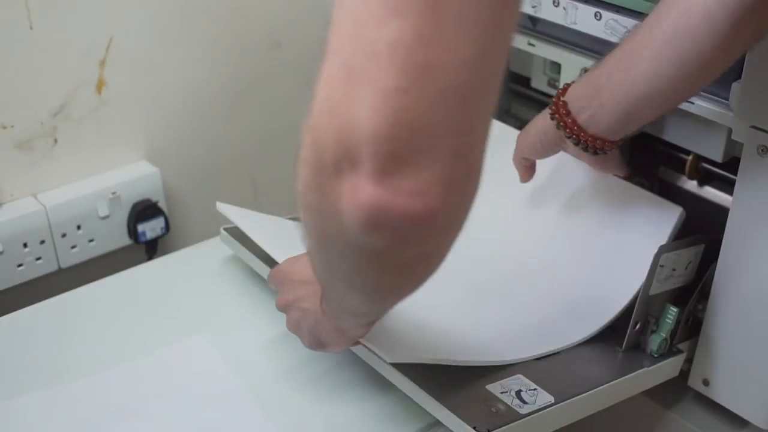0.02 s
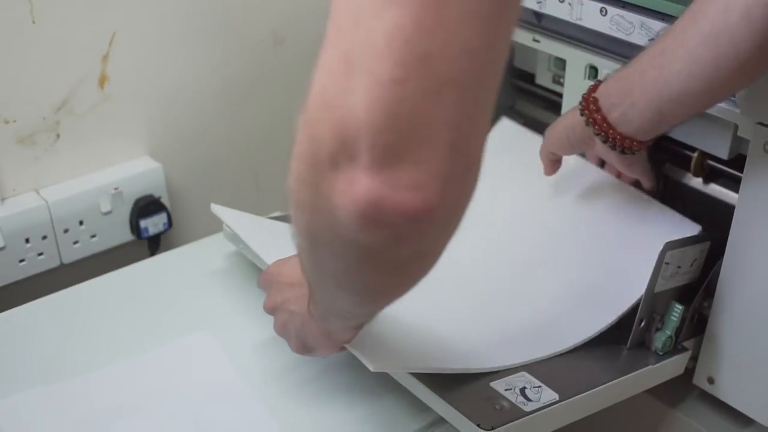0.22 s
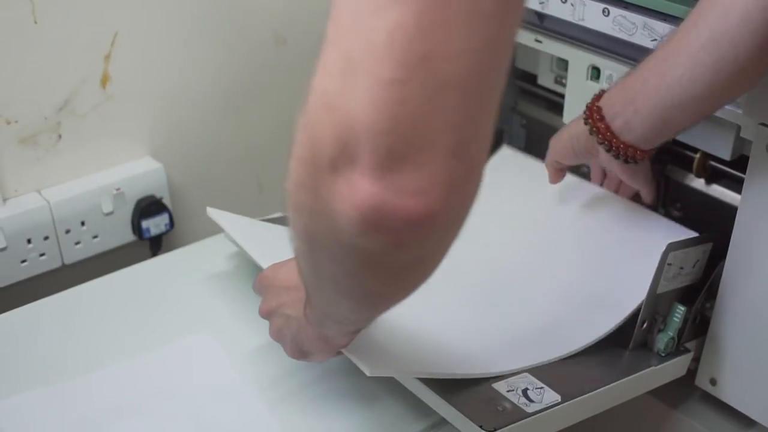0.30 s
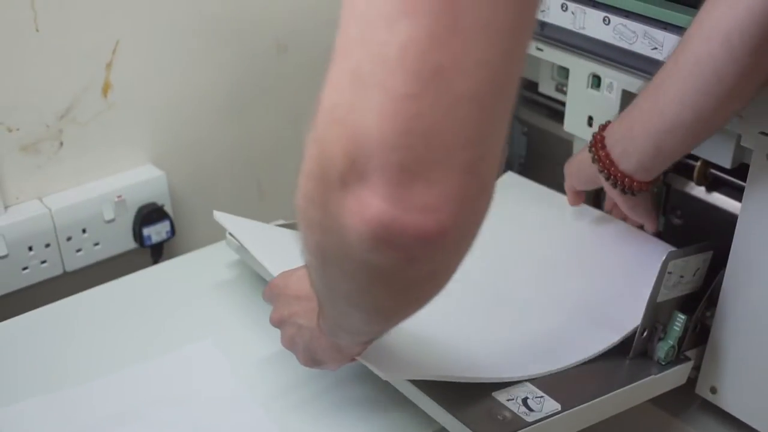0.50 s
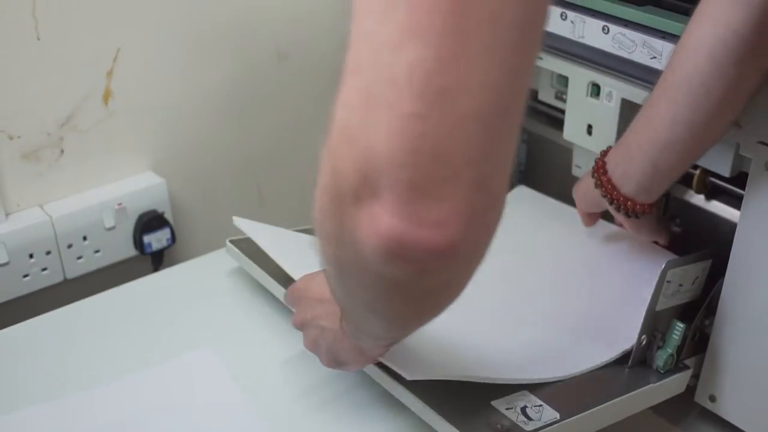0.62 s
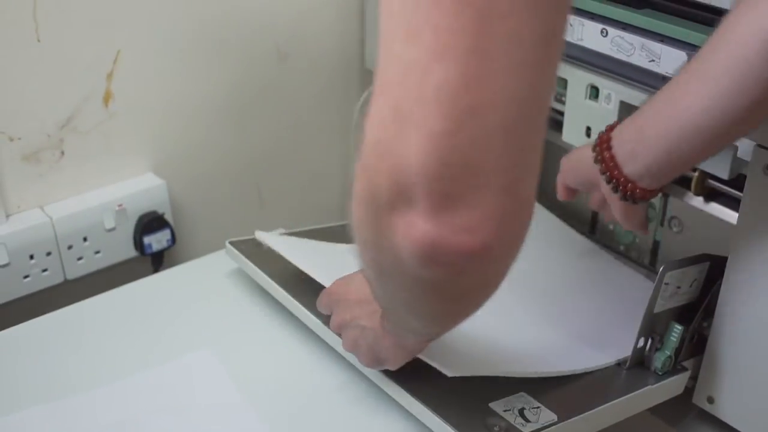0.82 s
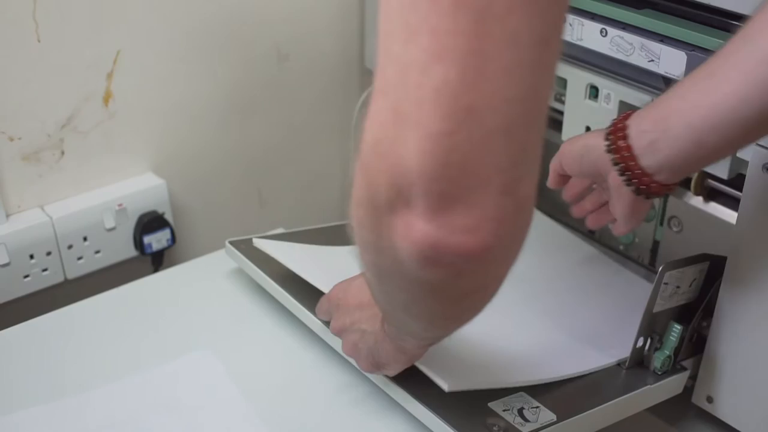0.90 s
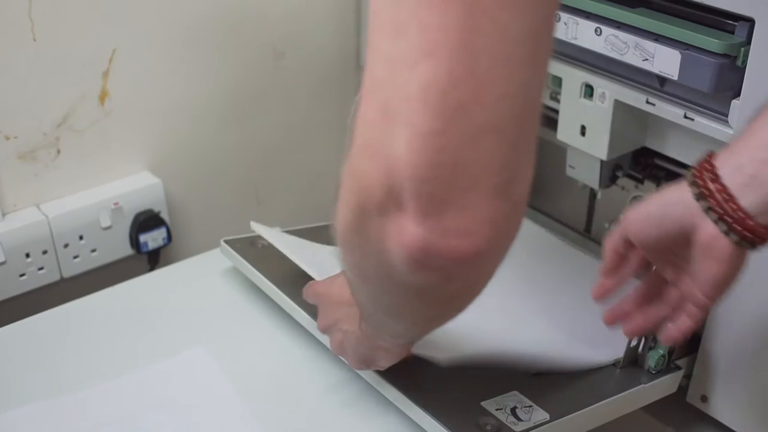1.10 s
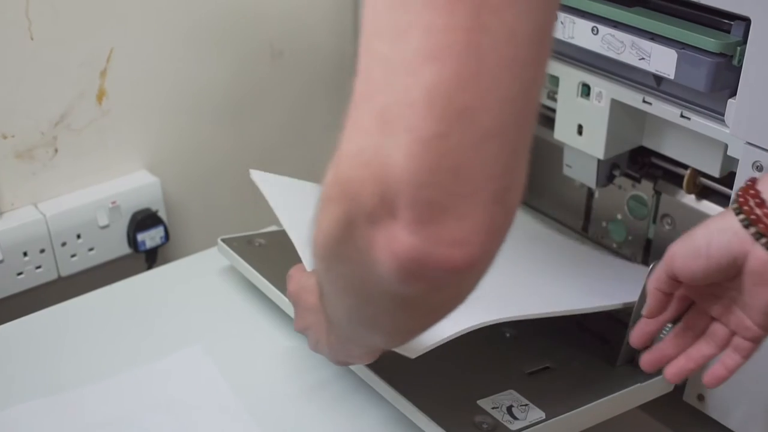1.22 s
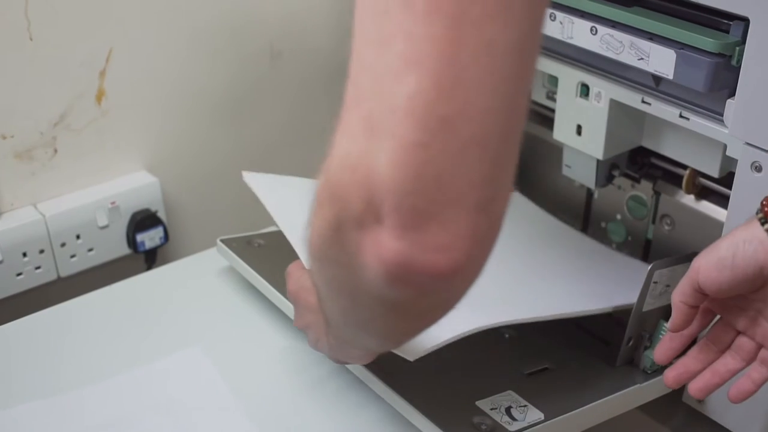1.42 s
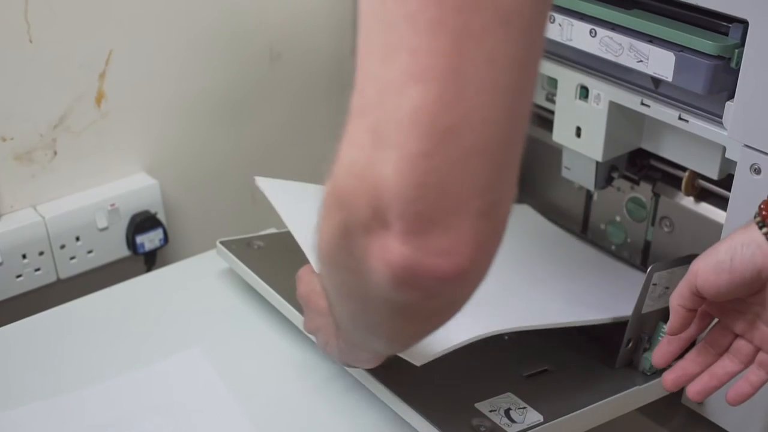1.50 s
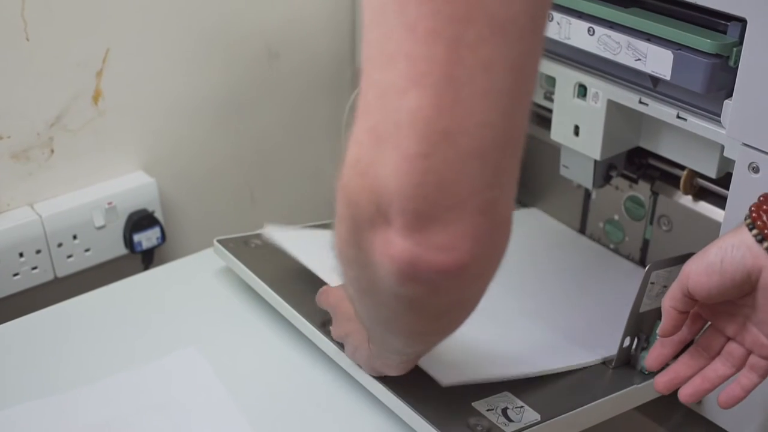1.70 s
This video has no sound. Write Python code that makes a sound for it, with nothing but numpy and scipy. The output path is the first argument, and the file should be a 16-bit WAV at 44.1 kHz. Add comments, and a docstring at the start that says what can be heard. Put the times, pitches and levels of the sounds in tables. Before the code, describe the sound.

In a small room with a faint fan hum, a paper stack flaps softly and knocks down on a metal tray, which rings briefly. Light fingertip brushing follows, then sliding paper and a few more soft flaps.

```python
"""In a small print room, a fan hums faintly over a low rumble. A thick stack of paper drops against
a printer's metal feed tray: a quick clatter of knocks sets the tray ringing. Fingers brush the top
sheet, and the stack hisses and rasps as it is dragged back and lifted. At the start and near the end
it buckles with soft flaps. The room adds a short echo to the knocks and flaps."""
import sys
import numpy as np
from scipy import signal
from scipy.io import wavfile

SR = 44100
rng = np.random.default_rng(int(sys.argv[2]) if len(sys.argv) > 2 else 0)


def transcribe(signal):
    """Save signal, clipped to [-1, 1], as a 16-bit WAV file at the path in sys.argv[1]."""
    frames = np.atleast_2d(signal).T
    limited = np.clip(frames, -1, 1)
    pcm = np.round(limited * 32767).astype(np.int16)
    wavfile.write(sys.argv[1], SR, pcm)


N = 74970
T = np.arange(N) / SR
BAND_EDGES_HZ = 28 * 2 ** (np.arange(29) / 3)  # three bands to an octave

# how long the room echoes: (frequency [Hz], time to fade by 60 dB [s])
ROOM_ECHO = [(60, 0.27), (160, 0.45), (300, 0.53), (700, .38), (2500, 0.5), (5000, 0.42), (9000, 0.33),
             (15000, 0.37)]
# how alike the two ears' noise is: (frequency [Hz], likeness [0 to 1])
EAR_LIKENESS = [(60, 0.99), (300, 0.91), (1000, 0.54), (2000, 0.4), (4000, 0.37), (8000, 0.25),
                (14000, 0.11)]
# where the sounds sit between the ears: (frequency [Hz], left minus right [dB])
PAPER_PAN = [(250, 0.0026), (4000, .3), (13000, 0.61)]
BRUSH_PAN = [(3000, 1), (13000, 6.1)]
KNOCK_PAN = [(250, -1), (1000, 0.5), (4000, 1.5), (8000, 0.9), (13000, 3.5)]

# each noise's mix of low and high sound: (frequency [Hz], relative level [dB])
FAN_COLOUR = [(30, -7.5), (90, 3), (200, -6), (520, -4.5), (800, -9.5), (1600, -14.5), (3200, -21.5),
              (7000, -30), (15000, -24.5)]
BRUSH_COLOUR = [(800, -30.5), (2800, -16), (5500, -24), (7000, -11.5), (10000, -8.5), (13500, -1),
                (16000, -5)]
SLIDE_COLOUR = [(900, -24.5), (2200, -7.5), (3200, -3), (4700, 1.5), (7000, -1), (13000, -.5),
                (16000, -0.5)]
SCUFF_COLOUR = [(200, -28), (450, 1), (700, -1.5), (1300, 3), (1800, -4.5), (2300, -5.5), (3000, 2.5),
                (4500, -20.5), (9000, -27.5)]
FLAP_COLOUR = [(40, -24.5), (110, -15), (240, -3), (350, -4.5), (600, -3.5), (860, -4), (1100, -11.5),
               (2100, -23.5), (3200, -18), (5000, -41), (15000, -40.5)]
CRACK_COLOUR = [(200, -18.5), (700, -10.5), (1550, -3), (2600, -5), (4000, -9), (6500, -21.5), (9000, -31),
                (15000, -42.5)]
KNOCK_COLOUR = [(35, -41), (70, -18), (120, -9.5), (170, -7), (250, -1), (470, -1), (900, -9.5),
                (1600, -12), (2700, -16), (4500, -27), (8000, -32.5), (15000, -33.5)]

# how the longer sounds grow and fade: (time [s], level [dB])
RUMBLE_LEVELS = [(0, -40.5), (.18, -57.5), (.3, -50.5), (.54, -55.5), (.6, -48.5), (.74, -52.5), (.86, -56),
                 (.97, -70), (1.14, -62), (1.23, -49.5), (1.4, -51.5), (1.7, -71)]
BRUSH_LEVELS = [(.6, -100), (.635, -66), (.7, -62.5), (.712, -51), (.745, -46.5), (.772, -59),
                (.812, -56.5), (.85, -71), (.97, -77.5), (1.025, -60.5), (1.08, -59), (1.2, -57.5),
                (1.3, -87.5)]  # fingertips on the top sheet
SLIDE_LEVELS = [(0, -49.5), (.04, -50.5), (.072, -47.5), (.1, -59), (.15, -70), (.6, -88), (.95, -98),
                (1.0, -70), (1.06, -53), (1.11, -53), (1.155, -48), (1.24, -53.5), (1.283, -46.5),
                (1.312, -57), (1.355, -50), (1.4, -55), (1.45, -62), (1.55, -69), (1.7, -107)]  # sheet on sheet
SCUFF_LEVELS = [(0, -47.5), (.08, -60), (.14, -71), (.5, -90), (1.05, -77), (1.11, -76), (1.155, -65.5),
                (1.21, -64.5), (1.26, -56), (1.28, -45.5), (1.305, -59), (1.335, -49.5), (1.45, -61),
                (1.52, -61), (1.56, -65), (1.6, -83.5), (1.7, -93)]  # the stack's underside on the tray

# the paper's edge rasps on the tray: (start [s], length [s], pitch [Hz], rough width [Hz], level [dB])
RASPS = [(0, 0.11, 2360, 500, -57.5), (0.988, 0.44, 3260, 300, -61), (1.049, 0.083, 3320, 220, -57.5),
         (1.065, 0.17, 1690, 258, -63), (1.12, 0.13, 1200, 600, -62.5), (1.312, 0.24, 2930, 1170, -61),
         (1.472, 0.15, 8700, 885, -70)]
# the bent stack drums: (start [s], length [s], pitch [Hz], relative level [dB], waver [share of pitch])
BENDS = [(0, .055, 440, -39, .15), (0, .055, 365, -40, .15), (0, .05, 118, -40, .08),
         (.075, .08, 100, -52, .1), (1.255, .065, 435, -56, .08), (1.355, .03, 450, -42, .06),
         (1.358, .018, 860, -35, .15), (1.382, .04, 250, -38, .08), (1.42, .05, 255, -43, .06),
         (1.608, .1, 448, -45, .03), (1.603, .035, 880, -52, .1), (1.568, .13, 60, -44, .08)]

# short hits: (time [s], relative strength [dB], brightness [dB per octave])
FLAPS = [(.002, -3, -3), (.03, -7.5, -6), (.085, -17.5, -4.5), (1.351, 1.5, 1), (1.3585, 2.5, -2.5),
         (1.3625, -2.5, 0.5), (1.382, -9, -4.5), (1.412, -3, -3.5), (1.552, -14, -5), (1.608, -17.5, -6.5)]  # the stack buckles
LANDING = [(.2425, 0.5, 0)]  # its whole weight comes down
CRACKS = [(.2412, -3.5, 5.5), (.2645, 1.5, 0.5), (.2695, 4, 0.5)]  # its edge strikes the metal guide
KNOCKS = [(.2398, -6, -1.5), (.2445, 0.5, 1), (.258, -1.5, -3), (0.2644, 0, 0), (.2705, -5, -0.4),
          (.303, -14, -6.5), (.328, -19.5, -6)]  # it hits the tray

# tones that the hits set ringing: (pitch [Hz], relative level [dB], time to fade by 60 dB [s])
HOLLOW_TONES = [(201, -12, .26), (259, -8.5, 0.65), (449.4, -1.5, 0.2), (671, -8.5, 0.34), (778, -4, 0.075),
                (893, 1, 0.12), (934, -6.5, 0.27), (1387, -10.5, 0.29)]  # the bent stack
THUMP_TONES = [(112.66, -14.5, 0.062), (215, -7, 0.029), (435.8, -14.5, .04)]  # the dull thump of its weight
GUIDE_TONES = [(1395, -5, .07), (1548, 2, .065), (1701, -3, 0.029)]  # the metal guide
TRAY_TONES = [(140.4, -16, 0.23), (192, -18, 0.65), (236.5, -5, 0.46), (272.3, -3.5, 0.43),
              (306.5, -4, 0.36), (374.1, 0.5, 0.33), (445.3, -4.5, 0.3), (539.2, 3, 0.25), (702, -10, 0.24),
              (804, -7.5, 0.15), (991, -15, .33), (1523, -14, 0.37), (1727, -18, 0.2), (1934, -22, 0.25),
              (2390, -18, 0.33), (2908, -21.5, 0.22)]  # the metal tray


def from_db(db):
    """Turn decibels into a number to multiply a sound by."""
    return 10 ** (np.asarray(db) / 20)


def rms_one(x):
    """Scale a sound so that its average level (rms) is 1."""
    return x / np.sqrt(np.mean(x ** 2) + 1e-20)


def level(rows):
    """A loudness curve drawn through (time [s], level [dB]) points."""
    return from_db(np.interp(T, *np.transpose(rows)))


def at_hz(points, hz):
    """Read a table at any frequency, with the octaves evenly spaced."""
    frequencies, values = np.transpose(points)
    return np.interp(np.log(hz), np.log(frequencies), values)


def panned(db):
    """Left and right volumes, with the left louder by db."""
    return from_db(np.array([[.5], [-.5]]) * db)


def drift(per_s):
    """A random wander around zero that heads for a new value per_s times a second."""
    return np.interp(T * per_s, np.arange(N), rng.standard_normal(N))


def swell(start, length):
    """A quick rise and a slower fall."""
    progress = np.clip((T - start) / length, 0, 1)
    return np.sin(np.pi * progress ** .6)


def wavering_tone(hz, width_hz):
    """A tone of steady level whose pitch wanders around hz."""
    pitch = hz + .5 * width_hz * drift(2 * width_hz)
    return np.sqrt(2) * np.sin(2 * np.pi * np.cumsum(pitch) / SR)


def noise_bands(colour, pan):
    """Noise, band by band: its frequency, the part both ears share (mid) and the opposed part (side)."""
    centres = np.sqrt(BAND_EDGES_HZ[1:] * BAND_EDGES_HZ[:-1])
    gains = from_db(at_hz(colour, centres)) * np.sqrt(centres)  # wider bands hold more sound
    gains /= np.linalg.norm(gains)
    for low, high, hz, gain in zip(BAND_EDGES_HZ, BAND_EDGES_HZ[1:], centres, gains):
        band = signal.butter(2, [low, high], "band", fs=SR, output="sos")
        noise = rng.standard_normal((2, N + SR // 10))  # extra length lets the filter settle
        mid, side = rms_one(signal.sosfilt(band, noise)[:, -N:])
        alike = np.clip(at_hz(EAR_LIKENESS, hz), 0, 1)
        ears = gain * panned(at_hz(pan, hz))
        mid = ears * np.sqrt((1 + alike) / 2) * mid
        side = ears * np.sqrt((1 - alike) / 2) * side * [[1], [-1]]
        yield hz, mid, side


def hiss(colour, pan):
    """Steady stereo noise of one colour."""
    return sum(mid + side for _, mid, side in noise_bands(colour, pan))


def stored_energy(hits, hz, fade_s, spread_db=0):
    """Each hit adds energy at one frequency, which then falls by 60 dB in fade_s."""
    times, db, brightness = np.transpose(hits)
    hit_db = db + brightness * np.log2(hz / 1000) + spread_db * rng.standard_normal(len(times))
    pushes = np.zeros(N)
    pushes[(times * SR).astype(int)] = from_db(hit_db) ** 2
    kept_per_sample = np.exp(-np.log(1e6) / (fade_s * SR))
    return signal.lfilter([1], [1, -kept_per_sample], pushes)


def envelope(energy, rise_s):
    """Turn energy into a loudness curve with a softened start."""
    lag = np.exp(-1 / (rise_s * SR))
    return np.sqrt(signal.lfilter([1 - lag], [1, -lag], energy))


def bursts(hits, colour, pan, rise_s, fade_s, room_db):
    """Each hit is a puff of noise, followed by the room's wider echo, which dies band by band."""
    direct_width = 0.43  # stereo width, where the echo's is 1
    out = 0
    for hz, mid, side in noise_bands(colour, pan):
        direct = stored_energy(hits, hz, fade_s)
        echo = from_db(room_db) ** 2 * stored_energy(hits, hz, at_hz(ROOM_ECHO, hz))
        out += mid * envelope(direct + echo, rise_s)
        out += side * envelope(direct_width ** 2 * direct + echo, rise_s)
    return out


def ringing(hits, tones, pan, rise_s):
    """A struck object rings at its own pitches; every hit feeds each one by a slightly random amount."""
    out = 0
    for hz, db, fade_s in tones:
        tone = np.sin(2 * np.pi * (hz * T + rng.random()))
        energy = stored_energy(hits, hz, fade_s, spread_db=-2.5)
        out += panned(at_hz(pan, hz)) * from_db(db) * tone * envelope(energy, rise_s)
    return out


def room_background():
    """The fan's soft rush and wavering hum, and a low rumble that comes and goes."""
    fan = from_db(-61) * hiss(FAN_COLOUR, PAPER_PAN)
    flutter_db = 4 * drift(per_s=50)
    hum = from_db(-66 + flutter_db) * wavering_tone(hz=571.5, width_hz=28)
    rumble = level(RUMBLE_LEVELS) * wavering_tone(hz=49.3, width_hz=14)
    return fan + hum + rumble


def rubbing(levels, colour, pan):
    """Rubbed paper hisses, and its catching fibres make the hiss a little rough."""
    roughness_db = 0.5 * drift(per_s=1700)
    return level(levels) * from_db(roughness_db) * hiss(colour, pan)


def fingers_brush():
    """Fingertips rub the top sheet with a thin, high hiss."""
    return rubbing(BRUSH_LEVELS, BRUSH_COLOUR, BRUSH_PAN)


def edge_rasps():
    """The paper's edge scrapes the tray, stirring up narrow bands of noise that come and go."""
    out = 0
    for start, length, hz, width, db in RASPS:
        peak = signal.iirpeak(hz, hz / (1.2 * width), fs=SR)
        friction = rng.standard_normal(N) + 0.79 * rng.standard_normal((2, N))
        rasp = signal.lfilter(*peak, signal.lfilter(*peak, friction))
        out += from_db(db) * swell(start, length) * rms_one(rasp)
    return out


def stack_drags():
    """Sheets slide over each other while the stack's underside and edge rub on the tray."""
    slide = rubbing(SLIDE_LEVELS, SLIDE_COLOUR, PAPER_PAN)
    scuff = rubbing(SCUFF_LEVELS, SCUFF_COLOUR, PAPER_PAN)
    return slide + scuff + edge_rasps()


def stack_drums():
    """The bending stack gives short drum tones; slipping sheets make them waver and flutter."""
    out = 0
    for start, length, hz, db, waver in BENDS:
        flutter_db = 3.2 * drift(per_s=min(130, hz / 2))
        out += from_db(db + flutter_db) * swell(start, length) * wavering_tone(hz, 2 * waver * hz)
    return out


def stack_buckles():
    """The stack gives way with soft flaps, a hollow ring and some drumming."""
    flaps = bursts(FLAPS, FLAP_COLOUR, PAPER_PAN, rise_s=.002, fade_s=.035, room_db=-7.5)
    hollow = ringing(FLAPS, HOLLOW_TONES, PAPER_PAN, rise_s=.0013)
    return from_db(-35) * flaps + from_db(-47) * hollow + from_db(-2) * stack_drums()


def stack_lands():
    """The stack thumps and slaps down, its edge cracks on the guide, and guide and tray both ring."""
    thump = ringing(LANDING, THUMP_TONES, KNOCK_PAN, rise_s=.002)
    slap = bursts(KNOCKS, KNOCK_COLOUR, KNOCK_PAN, rise_s=.0018, fade_s=.1, room_db=-10)
    crack = bursts(CRACKS, CRACK_COLOUR, KNOCK_PAN, rise_s=.00049, fade_s=.028, room_db=-26.5)
    guide = ringing(CRACKS, GUIDE_TONES, KNOCK_PAN, rise_s=.0016)
    tray = ringing(KNOCKS, TRAY_TONES, KNOCK_PAN, rise_s=.00087)
    metal = from_db(-24) * guide + from_db(-21) * tray
    return thump + from_db(-13) * slap + from_db(-20) * crack + metal


def scene():
    """All the paper sounds over the room's background."""
    return stack_drags() + fingers_brush() + stack_lands() + stack_buckles() + room_background()


def record(dry):
    """Cut the deepest bass, round off the loudest peaks and cut the highest treble."""
    bass_cut_hz, peak_limit, treble_cut_hz = 58.2, .9, 15780
    dry = signal.sosfilt(signal.butter(4, bass_cut_hz, "high", fs=SR, output="sos"), dry)
    rounded = dry / (1 + (dry / peak_limit) ** 4) ** .25
    return signal.sosfilt(signal.ellip(12, .1, 90, treble_cut_hz, fs=SR, output="sos"), rounded)


dry = scene()
out = record(dry)
transcribe(out)
```